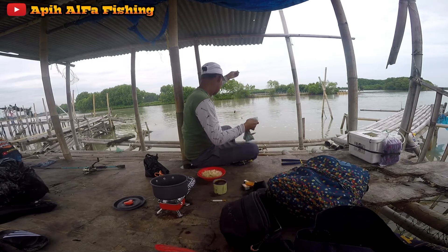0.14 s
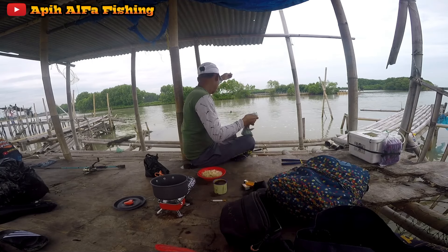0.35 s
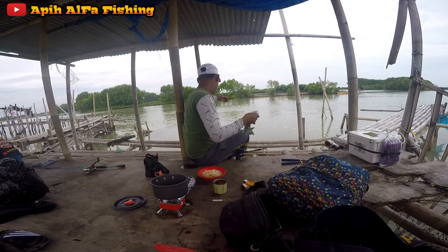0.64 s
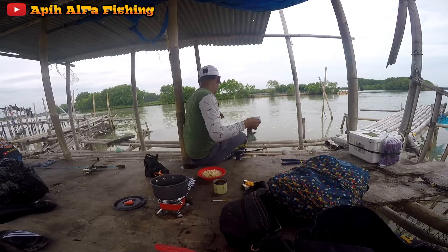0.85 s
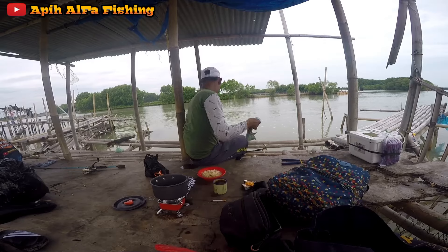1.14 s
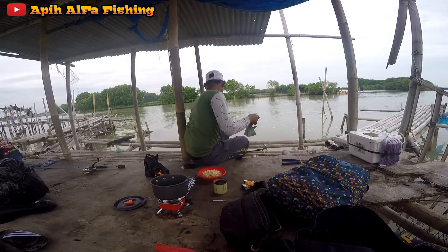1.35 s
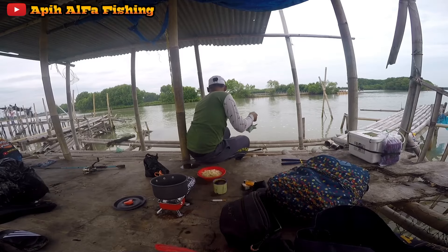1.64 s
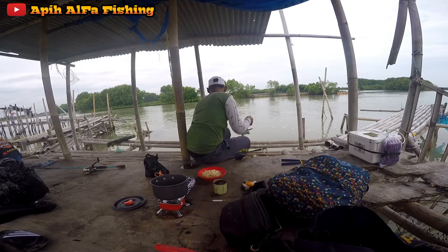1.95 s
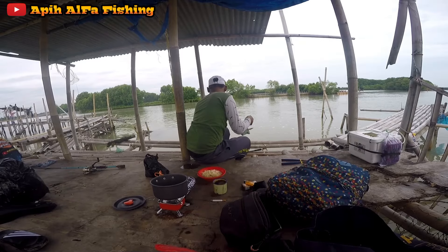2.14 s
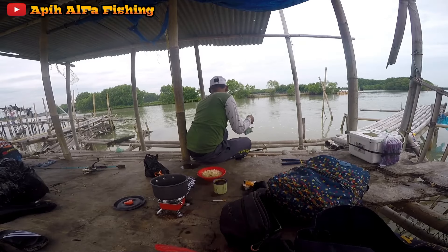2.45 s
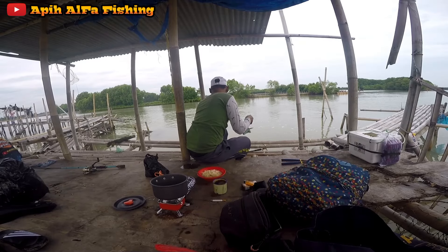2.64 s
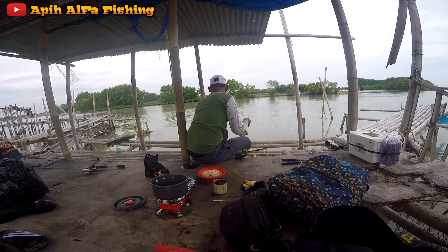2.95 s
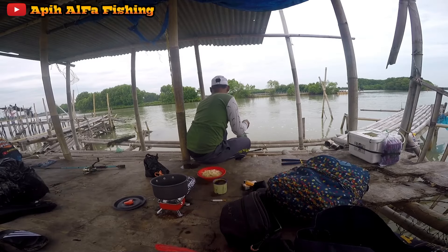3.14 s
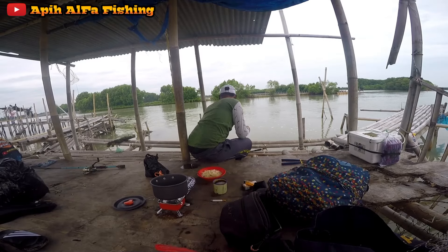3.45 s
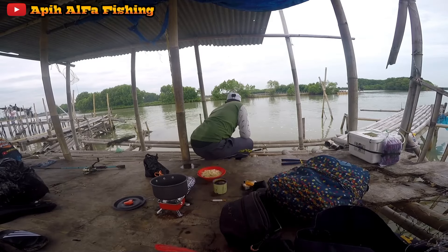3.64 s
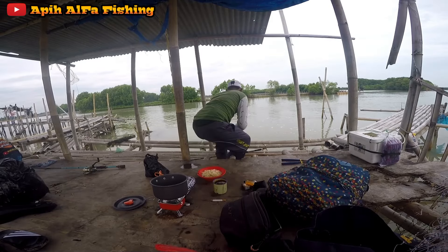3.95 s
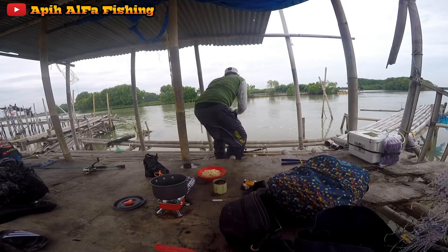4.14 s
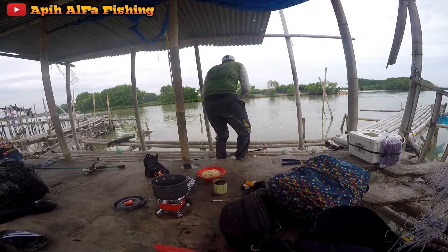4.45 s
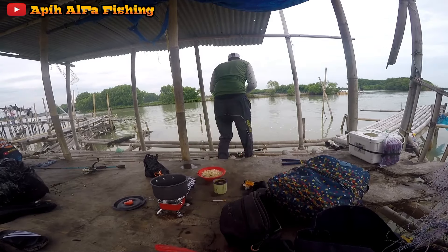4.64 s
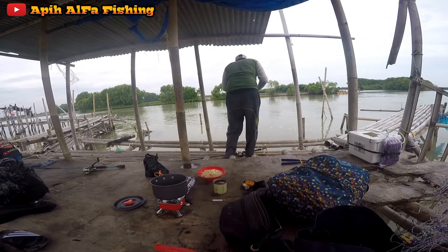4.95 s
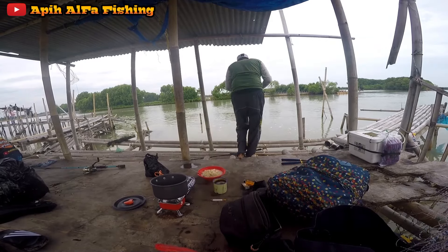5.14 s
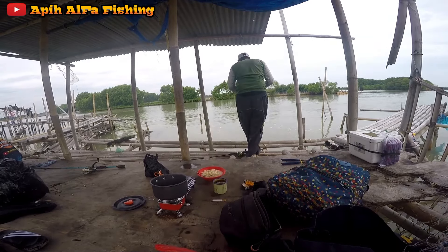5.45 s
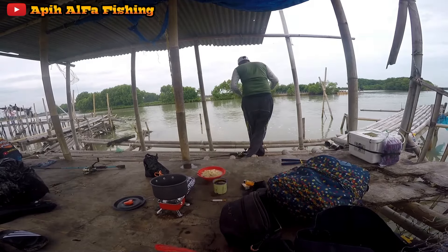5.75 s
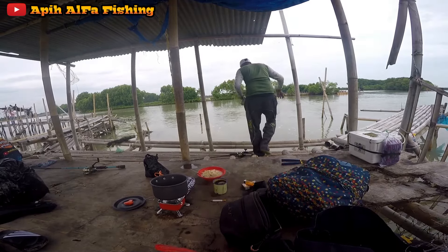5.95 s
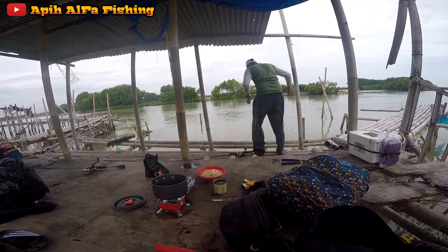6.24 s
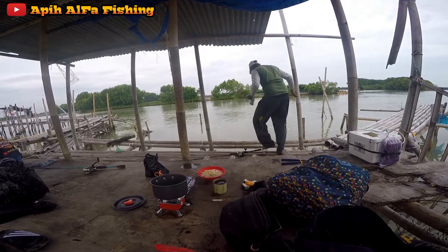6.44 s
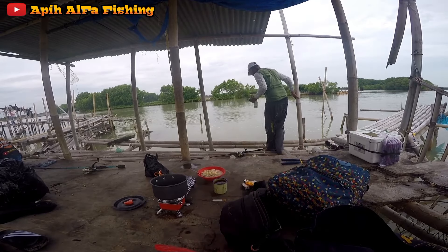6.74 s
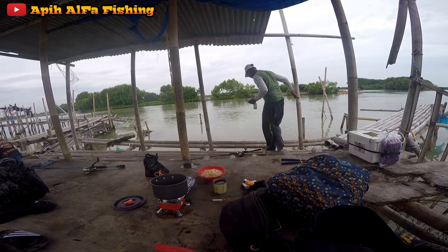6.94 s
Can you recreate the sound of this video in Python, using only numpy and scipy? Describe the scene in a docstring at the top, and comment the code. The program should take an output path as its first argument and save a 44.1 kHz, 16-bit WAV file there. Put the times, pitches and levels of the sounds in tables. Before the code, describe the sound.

On an open bamboo and plank platform by a river, a person shifts, gets up and steps about. Small dry pole knocks and soft thumps come first, then a quiet spell, a cluster of hollow knocks while rising, and a heavy low boom with a sharp crack just after five seconds. Faint rapid ticking, soft hiss, steady low hum and a thin high whine continue. The microphone sits close on the same deck.

```python
"""Bamboo poles knock in their lashings as a man gets up and steps about on a bamboo and plank
platform by a river; the camera's microphone is close by, on the same deck. Knocks, squeaks and rubs are
tiny slips or noise through pole resonances; thuds are dying deck modes; sway and boom are shaped noise.
Behind them lie a faint regular ticking of noise bursts through resonances, hiss of shaped noise,
a low steady sine hum and the thin whine of the camera's electronics, two interrupted sines."""
import sys
import numpy as np
from scipy import signal
from scipy.fft import rfft, irfft, next_fast_len
from scipy.io import wavfile
from scipy.ndimage import uniform_filter1d

SR = 44100
rng = np.random.default_rng(int(sys.argv[2]) if len(sys.argv) > 2 else 0)


def pcm_store(signal):
    """Save signal as 16-bit PCM."""
    levels = np.round(np.clip(np.atleast_2d(signal), -1, 1) * 32767)
    wavfile.write(sys.argv[1], SR, levels.astype(np.int16).T)


N = 312228
TIME = np.arange(N) / SR

# resonances of the poles, heard through the deck: pitch_hz, width_hz, relative_level_db
POLE_MODES = [(480, 110, 0), (790, 220, -6), (1240, 140, 1), (1540, 130, 0), (2200, 260, 0),
              (2730, 260, -2), (3600, 300, 0), (3860, 280, 1.5), (5200, 1100, -10), (7200, 1300, -16),
              (11500, 3000, -22)]
# ringing of the deck: pitch_hz, relative_level_db, t60_s
DECK_MODES = [(118.9, -5, 1), (126.2, -3, 0.65), (151.3, 0, 0.26), (205.5, -7.5, 0.15), (247.6, -2, 0.23),
              (260.5, -3, 0.35), (295.8, -8, 0.19), (330.5, -9.5, 0.15), (380, -16.5, 0.085),
              (435.3, -5.5, 0.17), (487.6, -10, 0.07), (558, -18, 0.2)]
# shifts of weight on the deck: start_s, rise_s, hold_s, frame_sway_db, plank_boom_db, joint_groan_db
WEIGHT_SHIFTS = [(0.22, 0.052, 0.25, -51, -51, -74), (0.57, 0.042, 0.12, -34, -53, -63),
                 (0.757, 0.057, 0.14, -51, -67, -61), (1.136, 0.037, 0.081, -36.5, -48.5, -53),
                 (1.533, 0.056, 0.049, -33.5, -50, -68.5), (1.86, 0.023, 0.033, -57, -56, -60),
                 (2.497, 0.027, 0.2, -56, -55, -67), (3.052, 0.023, 0.025, -49.5, -64, -63),
                 (3.638, 0.054, 0.031, -43, -46, -52), (3.744, 0.035, 0.095, -28, -39.5, -66),
                 (4.052, 0.034, 0.018, -38.5, -46.5, -79), (4.446, 0.039, .02, -44, -46, -76),
                 (4.726, 0.056, 0.026, -20.5, -29.5, -54), (4.84, 0.031, 0.087, -25.5, -38.5, -60),
                 (5.133, 0.045, 0.041, -28.5, -46, -61), (5.268, 0.073, 0.056, -17, -31, -51),
                 (5.424, 0.068, 0.044, -20, -35, -60.5), (5.808, 0.062, 0.11, -29.5, -49, -78),
                 (6.026, .03, 0.031, -33, -43, -60), (6.14, 0.034, .03, -36.5, -47.5, -76),
                 (6.52, 0.046, 0.058, -36.5, -58, -85), (6.963, 0.036, .08, -49, -52.5, -60)]


def amp(db):
    """Decibels to amplitude."""
    return 10 ** (np.asarray(db) / 20)


def unit(x):
    """Scales x to an RMS level of 1."""
    return x / np.sqrt(np.mean(x ** 2) + 1e-20)


def read(points, hz):
    """Reads a spectrum in dB, joined on a log-frequency axis and flat beyond its ends."""
    point_hz, db = np.transpose(points)
    return np.interp(np.log(hz + 1), np.log(point_hz), db)


def add(mix, start_s, sound):
    """Lays a sound into the mix from the given time, cut off at the end."""
    part = mix[max(round(start_s * SR), 0):][:len(sound)]
    part += sound[:len(part)]


def colour(x, points):
    """Filters x by the spectrum of the points, without phase shift."""
    size = next_fast_len(len(x) + 2048)
    gain = amp(read(points, np.fft.rfftfreq(size, 1 / SR)))
    return irfft(rfft(x, size) * gain, size)[:len(x)]


def resonate(x, modes):
    """Rings parallel resonances (Hz, width Hz, dB) of alternating sign."""
    total = 0
    for k, (hz, width, db) in enumerate(modes):
        b, a = signal.iirpeak(hz, hz / width, SR)
        total = total + (-1) ** k * amp(db) * signal.lfilter(b, a, x)
    return total


def smooth(x, seconds):
    """Averages twice over a sliding span."""
    size = max(int(seconds * SR), 1)
    return uniform_filter1d(uniform_filter1d(x, size), size)


def steadied(x, seconds):
    """Holds the level of x near 1 over spans longer than the given time."""
    return x / np.sqrt(abs(smooth(x ** 2, seconds)) + 1e-20)


def slips(size, per_s, spread_db):
    """Tiny stick-slip clicks at random moments, of uneven strength and either sign."""
    chance = rng.random(size)
    strength = np.clip(rng.standard_normal(size), -2, 2)
    sign = rng.choice([-1., 1.], size)
    return sign * amp(spread_db * strength) * (chance < per_s / SR)


def knocks(direct_db=-9):
    """A pole shifts in its lashing: a volley of slips swells and dies, direct and through ringing bamboo."""
    # bamboo knocks: start_s, hollow_body_db, crack_db, splinters_db, brightness_db_per_octave, swell_s, t60_s
    # (the levels are RMS over the first 40 ms; brightness tilts 1 to 8 kHz)
    knock_list = [(0.231, -60, -66, -86, -18, .004, .15), (0.588, -65, -66, -74, -6, 0.0096, 0.21),
                  (1.155, -73, -66, -77, -9, 0.0062, .13), (1.244, -73, -50, -71, 0.5, .011, 0.14),
                  (1.406, -76, -58.5, -64, 15, 0.011, 0.093), (1.826, -72, -62, -77, -11, 0.011, .16),
                  (1.866, -66, -49.5, -83, 2, 0.0092, 0.11), (2.558, -71, -56.5, -64, -9.5, .012, 0.17),
                  (2.587, -70, -61.5, -68, -8, .011, 0.16), (3.036, -71, -58.5, -81, -2, 0.013, .15),
                  (3.625, -58, -59, -64, -12, 0.0042, 0.32), (3.667, -62, -54, -72, 3, 0.0071, 0.11),
                  (3.741, -73, -61.5, -67, -3, .012, 0.2), (3.851, -55.5, -57, -74, -17, 0.0065, 0.18),
                  (4.733, -51, -52.5, -72, -0.5, 0.0092, 0.14), (5.304, -49, -45.5, -59, 2.5, 0.01, .14),
                  (5.96, -82, -67, -71, -6, 0.006, 0.09), (6.03, -61.5, -70, -69, -11, .008, 0.17)]
    # where the hollow body, the crack and the splinters sound: low_hz, high_hz
    knock_bands = [(330, 705), (850, 4150), (4300, 18000)]
    # dry snap of the slips themselves: pitch_hz, relative_level_db
    snap = [(400, 2), (800, -3.5), (1500, 5.5), (2800, -3), (3800, 8), (4500, -14.5), (8000, -9.5),
            (13000, -36)]
    out, t = np.zeros(N), np.arange(SR // 4) / SR
    for start_s, hollow_db, crack_db, splinters_db, brightness, swell, t60 in knock_list:
        shape = np.minimum((t + .001) / swell, 1) * amp(-60 * np.maximum(t - swell, 0) / t60)
        grit = slips(len(t), 4000, 6.3) + 0.08 * rng.standard_normal(len(t))
        volley = steadied(grit, 0.0045) * shape
        dry_snap = colour(slips(len(t), 6000, 3), snap) / np.sqrt(6000 / SR)  # evens out the click rate
        direct = amp(direct_db) * dry_snap * shape
        tilt = [(1000, 0), (8000, 3 * brightness)]  # three octaves
        ring = colour(resonate(volley, POLE_MODES) + direct, tilt)
        for band, db in zip(knock_bands, (hollow_db, crack_db, splinters_db)):
            band_filter = signal.butter(4, band, "bandpass", fs=SR, output="sos")
            part = signal.sosfilt(band_filter, ring)
            add(out, start_s, amp(db) * part / part[t < .04].std())
    return out


def glide(hz, width_hz):
    """A fuzzy tone, narrow noise of the given width, that follows the curve hz."""
    a, b = rng.standard_normal((2, len(hz)))
    blur = signal.lfilter([1], [1, -np.exp(-np.pi * width_hz / SR)], a + 1j * b)
    carrier = np.exp(2j * np.pi * np.cumsum(hz) / SR)
    return steadied((blur * carrier).real, 0.0019)


def clunk(width_hz=70, sink_s=0.0155):
    """One hollow blow as he rises: a fuzzy tone whose pitch sinks while it dies."""
    # hollow clunk, a single row: start_s, first_hz, last_hz, level_db, t60_s
    start_s, first_hz, last_hz, db, t60 = (3.853, 1400, 1100, -48, .13)
    out, t = np.zeros(N), np.arange(SR // 5) / SR
    pitch = last_hz + (first_hz - last_hz) * np.exp(-t / sink_s)
    tone = resonate(glide(pitch, width_hz), [(1250, 620, 0)])
    attack = 1 - np.exp(-t / 0.0072)
    add(out, start_s, tone * amp(db - 60 * t / t60) * attack)
    return out


def squeaks(width_hz=220):
    """Slips lock on to one mode of a pole for a moment: a short fuzzy tone through that mode."""
    # thin squeaks of a pole turning in its lashing: start_s, length_s, pitch_hz, level_db
    squeak_list = [(1.406, .035, 3800, -58), (3.777, .05, 3860, -61.5), (4.642, .03, 3850, -66),
                   (4.692, 0.021, 3800, -65), (6.992, 0.12, 3850, -65.5)]
    out = np.zeros(N)
    for start_s, length, hz, db in squeak_list:
        size = int(length * SR)
        tone = resonate(glide(np.full(size, hz), width_hz), [(hz, 500, 0)])
        add(out, start_s, amp(db) * unit(tone) * signal.windows.tukey(size, .6))
    return out


def thuds(trim_db=-2):
    """A foot loads the planks and rings their modes; a longer contact weakens the higher ones."""
    # footfalls: start_s, level_db before the trim, contact_s
    footfalls = [(0.234, -62, 0.001), (0.597, -48.5, 0.0012), (1.169, -40.5, 0.0026), (1.873, -58, 0.00087),
                 (2.577, -53.5, 0.001), (3.054, -81, 0.001), (3.636, -45, 0.001), (3.78, -43.5, 0.002),
                 (4.751, -48, 0.001), (4.791, -45, 0.0008), (5.317, -26.5, 0.0016), (5.383, -36, 0.001),
                 (6.047, -49.5, 0.0014)]
    out, t = np.zeros(N), np.arange(SR) / SR
    for start_s, db, contact in footfalls:
        ring = np.zeros(len(t))
        for hz, mode_db, t60 in DECK_MODES:
            decay = amp(mode_db - 60 * t / t60)
            softening = 1 + (hz * contact) ** 2
            ring += decay / softening * np.sin(2 * np.pi * (hz * t + rng.random()))
        add(out, start_s, amp(db + trim_db) * ring * (1 - np.exp(-t / 0.01)))
    return out


def loading(levels_db, fall_db_per_s, rest_db, follow):
    """Each shift of weight rises, holds and dies, above a rest level that follows the frame's unrest."""
    # how much the frame keeps rocking between shifts: time_s, level_db (only its departure from the mean counts)
    unrest_curve = [(0, -57), (0.38, -36.5), (1.7, -39), (2.42, -46), (2.6, -58), (3.3, -52), (3.55, -41.5),
                    (4.65, -40.5), (6.0, -37), (7.08, -32)]
    unrest = np.interp(TIME, *np.transpose(unrest_curve))
    power = amp(rest_db + follow * (unrest - unrest.mean())) ** 2
    for (start_s, rise, hold, *_), db in zip(WEIGHT_SHIFTS, levels_db):
        attack = np.clip((TIME - start_s) / rise, 0, 1)
        release_s = np.maximum(TIME - start_s - rise - hold, 0)
        power = power + (attack * amp(db - fall_db_per_s * release_s)) ** 2
    return np.sqrt(power)


def sway(frame_rest_db=-43, planks_rest_db=-59, planks_follow=0.32):
    """The frame rocks and the planks boom as the weight moves: two bands of shaped low noise."""
    # slow modes of the frame: pitch_hz, relative_level_db
    frame_spectrum = [(8, -55), (20, -20), (25, -8.5), (29, 11.5), (33, -3.5), (38, -3.5), (45, -7),
                      (56, -2.5), (66, -14), (80, -19.5), (130, -43), (400, -130)]
    # boom of the planks: pitch_hz, relative_level_db
    plank_spectrum = [(20, -62), (55, -23), (82, -17), (95, -12.5), (112, 12), (128, 7.5), (140, 2.5),
                      (149, -7), (170, -14), (230, -40), (900, -130)]
    *_, frame_db, planks_db, _ = np.transpose(WEIGHT_SHIFTS)
    rocking = steadied(colour(rng.standard_normal(N), frame_spectrum), 0.16)
    booming = steadied(colour(rng.standard_normal(N), plank_spectrum), 0.071)
    # falls of 73 and 120 dB per second after each shift
    rocking = rocking * loading(frame_db, 73, frame_rest_db, 0.85)
    booming = booming * loading(planks_db, 120, planks_rest_db, planks_follow)
    return rocking + booming


def groan(rest_db=-73, follow=0.18, upper_db=-7, fall_db_per_s=167):
    """Slow slips in the loaded joints ring the deck modes above 180 Hz, those above 400 Hz held lower."""
    *_, joints_db = np.transpose(WEIGHT_SHIFTS)
    modes = [(hz, 1.77 / t60, db + upper_db * (hz > 400))  # a longer ring is a narrower resonance
             for hz, db, t60 in DECK_MODES if hz > 180]
    ring = steadied(resonate(slips(N, 300, 4.0), modes), 0.016)
    return ring * loading(joints_db, fall_db_per_s, rest_db, follow)


def rubs(trim_db=-1, taper=0.62):
    """Fine friction grains under soles and cloth; taper is the share of a rub spent swelling and fading."""
    # soles and cloth rubbing on the deck: start_s, length_s, level_db before the trim
    rub_list = [(0.283, .04, -65), (0.32, 0.094, -66), (0.651, 0.07, -62.5), (2.975, .06, -65),
                (3.652, 0.13, -58.5), (4.64, 0.093, -62), (6.386, 0.13, -67.5), (6.985, 0.14, -61.5)]
    spectrum = [(500, 5), (1300, 2), (2700, 3.5), (3700, 10), (6000, 4), (12000, -17)]  # Hz, dB
    grains = colour(resonate(slips(N, 2500, 4.3), POLE_MODES), spectrum)
    level = np.zeros(N)
    for start_s, length, db in rub_list:
        add(level, start_s, amp(db + trim_db) * signal.windows.tukey(int(length * SR), taper))
    return unit(grains) * level


def ticking(level_db=-60, uneven_db=0.9, t60=0.08, high_t60=0.042):
    """A faint tick, about seven a second: noise bursts ring resonances, and the highest dies first."""
    # ringing of one tick: pitch_hz, width_hz, relative_level_db, delay_s
    tick_modes = [(7700, 710, -7.5, 0.00062), (3894, 380, -5.5, 0.0041), (3370, 440, -3.5, 0),
                  (2113, 82, -7, 0.0021), (1440, 470, -4, .005)]
    # strength of the ticking: time_s, relative_level_db
    strength_curve = [(0, -5.5), (1.5, -1.5), (4, -3), (5, -1), (7, -3.5)]
    first_s, gap_s = .006, .14337
    out, t = np.zeros(N), np.arange(SR // 10) / SR
    for start_s in np.arange(first_s, TIME[-1], gap_s):
        strength_db = level_db + np.interp(start_s, *np.transpose(strength_curve))
        for hz, width, db, delay in tick_modes:
            burst = rng.standard_normal(len(t)) * amp(-60 * t / (high_t60 if hz > 6000 else t60))
            ring = resonate(resonate(burst, [(hz, width, 0)]), [(hz, 2 * width, 0)])
            peak = np.sqrt(smooth(ring ** 2, 0.005).max())
            size = amp(strength_db + db + uneven_db * rng.standard_normal())
            add(out, start_s + delay - .003, size * ring / peak)
    return out


def background(hiss_db=-64.5, peaks_db=-68, waver_db=1.47, hum_db=-46.0, hum_hz=68.15):
    """Soft shaped-noise hiss with a few resonances that waver together, and a low steady sine hum."""
    # background hiss: pitch_hz, relative_level_db per Hz
    hiss_spectrum = [(40, -52), (100, -9), (170, -1.5), (350, -12), (900, -15), (1300, -25), (1870, -15.5),
                     (3700, -17), (4400, -19), (6500, -23), (9000, -24), (13000, -28), (15000, -29.5)]
    # narrow colours of the background: pitch_hz, width_hz, relative_level_db
    narrow_modes = [(468, 250, 8), (1320, 303, 7), (1670, 60, 7), (2077, 83, 2.5), (3670, 250, 4),
                    (8020, 120, 0.5)]
    hiss = unit(colour(rng.standard_normal(N), hiss_spectrum))
    waver = unit(smooth(rng.standard_normal(N), 0.071))
    peaks = resonate(rng.standard_normal(N), narrow_modes)
    peaks = unit(colour(peaks, [(8500, -3), (12000, -38)]))
    hum = np.sqrt(2) * np.sin(2 * np.pi * hum_hz * TIME)
    return amp(hiss_db) * hiss + amp(peaks_db + waver_db * waver) * peaks + amp(hum_db) * hum


def whine(first_db=-80, second_db=-69, scan_hz=6307.8, picture_hz=29.97):
    """Camera electronics: a scan tone and its octave, which pause and restart with every picture."""
    cycle = (TIME * picture_hz) % 1
    phase = 2 * np.pi * scan_hz * cycle / picture_hz
    running = smooth((cycle < .943) * 1., .0003)
    tones = amp(first_db) * np.sin(phase) + amp(second_db) * np.sin(2 * phase)
    return np.sqrt(2) * running * tones


def scene():
    """The platform at close range, then the faint layers behind it."""
    platform = knocks() + clunk() + squeaks() + thuds() + sway() + groan() + rubs()
    return (platform + ticking() + background() + whine())[None]


def record(dry):
    """The band limit of the camera: a steep low-pass at 15.1 kHz."""
    taps = signal.firwin(511, 15100, window=("kaiser", 9), fs=SR)
    return signal.oaconvolve(dry, taps[None], "same")


dry = scene()
out = record(dry)
pcm_store(out)
```